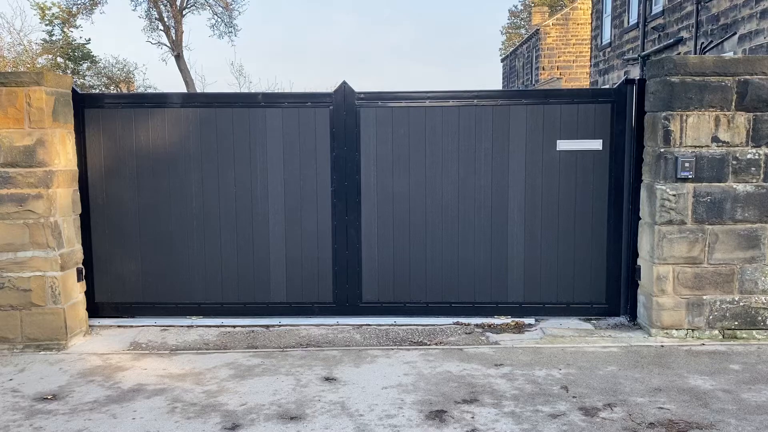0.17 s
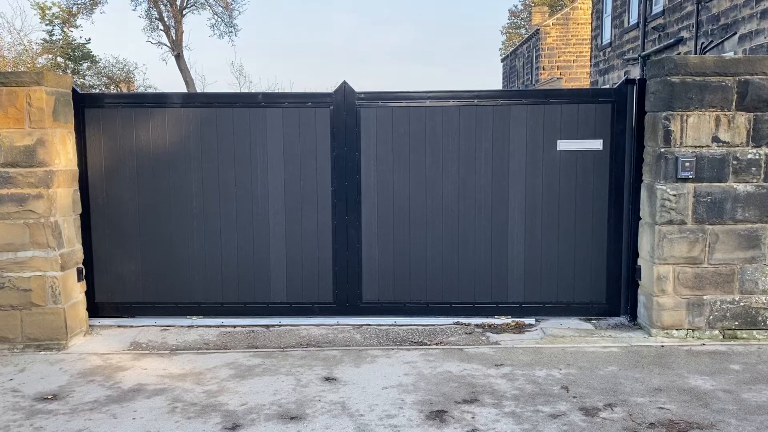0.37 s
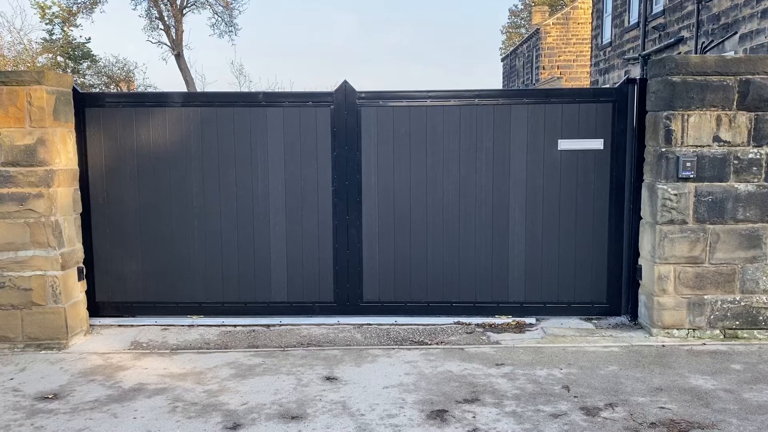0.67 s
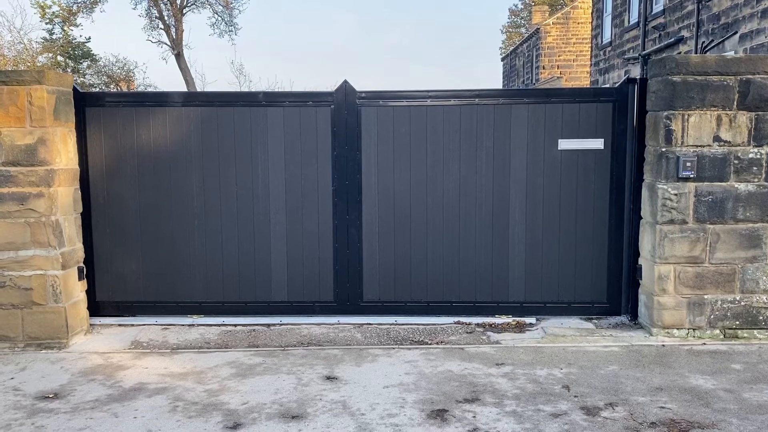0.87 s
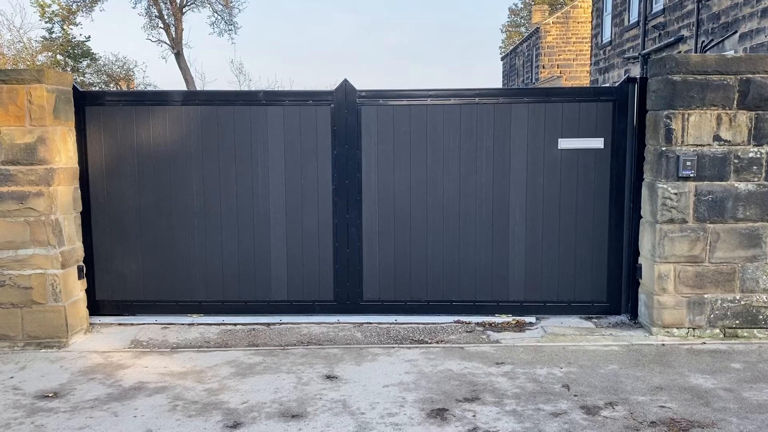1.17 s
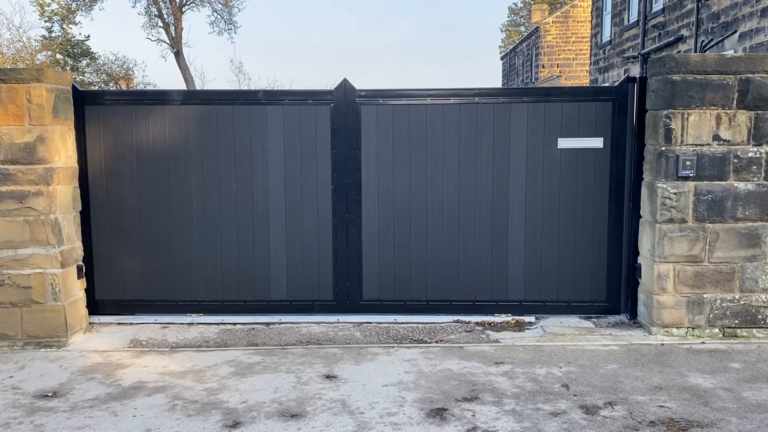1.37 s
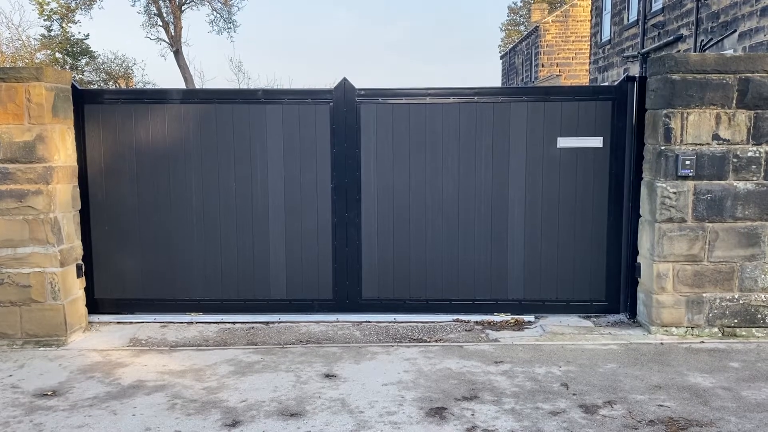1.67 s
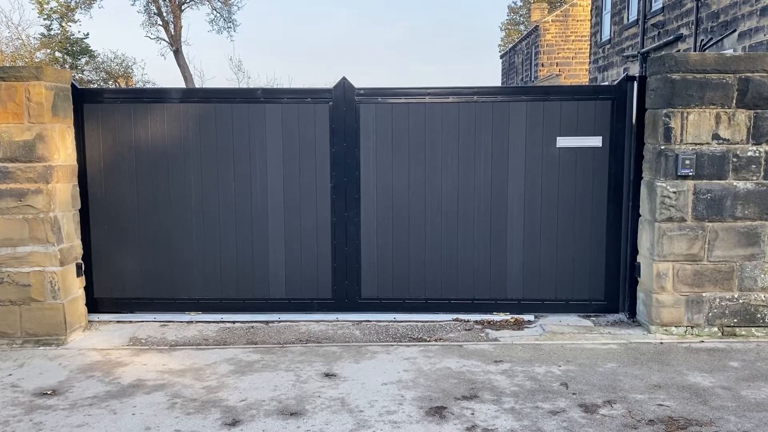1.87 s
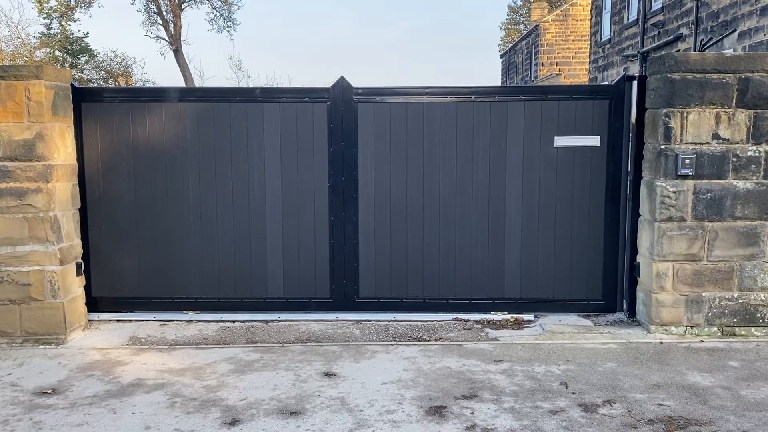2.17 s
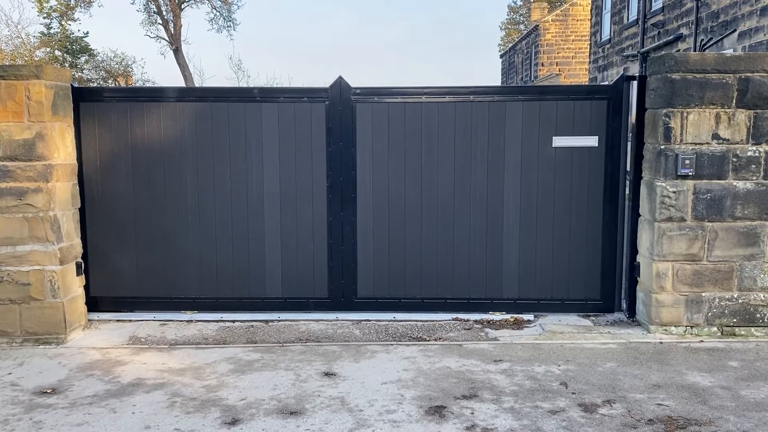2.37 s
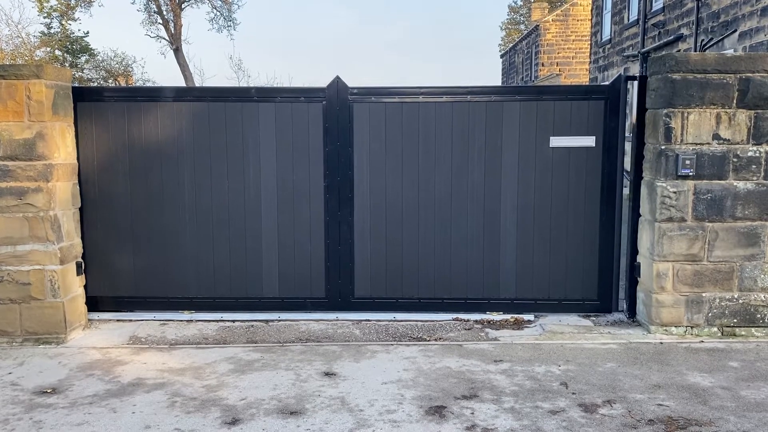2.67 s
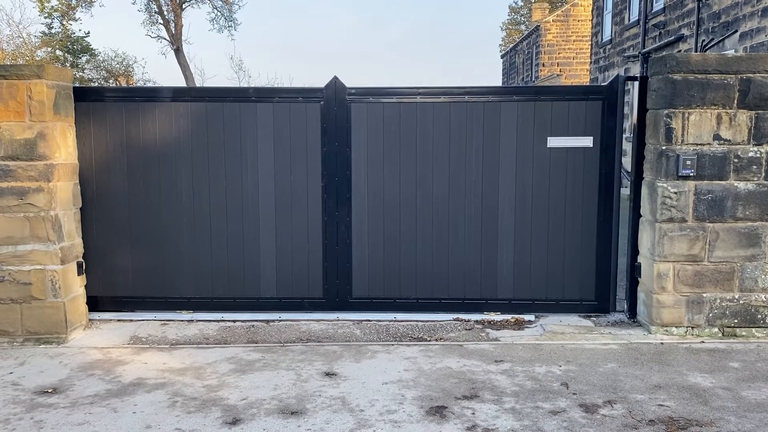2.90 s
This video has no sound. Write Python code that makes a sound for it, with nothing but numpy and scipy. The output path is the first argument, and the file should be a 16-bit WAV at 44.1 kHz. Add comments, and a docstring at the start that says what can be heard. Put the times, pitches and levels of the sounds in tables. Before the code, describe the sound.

Low outdoor traffic rumble and soft road hiss, a faint distant engine slowly climbing in pitch

```python
"""A quiet street outside a driveway gate, picked up by a phone with two microphone ports.
After a short silence, distant traffic rumbles and hisses: noise in bands that swell and flicker.
A lorry's drone dies away, a far engine climbs in pitch and a low hum sets in, all made of sines.
Small birds whistle, as gliding sines with an echo off the house walls. As the gate starts to slide,
its drive whines faintly, as tones and narrow noise, and its wheels hiss on the track, as shaped noise."""
import sys
import numpy as np
from scipy import signal
from scipy.fft import rfft, irfft
from scipy.io import wavfile
from scipy.ndimage import uniform_filter1d

SR = 44100
rng = np.random.default_rng(int(sys.argv[2]) if len(sys.argv) > 2 else 0)


def wrap_up_sound(samples):
    """Save the sound to the file named by the first command line argument, as 16-bit audio."""
    columns = np.atleast_2d(samples).T
    # keep every value between -1 and 1, then stretch to whole-number steps
    tamed = np.clip(columns, -1, 1)
    steps = np.round(tamed * 32767).astype(np.int16)
    wavfile.write(sys.argv[1], SR, steps)


def makeup_ratio(level_db):
    """Linear amplitude ratio for a level in decibels (20 dB per factor of ten)."""
    decades = np.asarray(level_db, float) / 20
    return 10 ** decades


N = 134064  # samples
T = np.arange(N) / SR  # time in seconds
F = np.maximum(np.fft.rfftfreq(N, 1 / SR), 1)  # frequency in Hz, kept above zero for the logarithms

# Spacing of the two microphone ports, heard as likeness, phase and balance:
# freq_hz, likeness (0-1), right_leads_rad, left_minus_right_db
PORT_RESPONSE = [(30, .995, .1, 0), (90, .97, .3, -.3), (260, .85, .55, -1.2), (430, .66, 1.2, -.3),
                 (780, .55, 2.8, -3.8), (1100, .63, 2.6, -2.9), (1700, .62, 2.4, -1.1),
                 (2000, .42, 1.6, -.6), (2200, .05, 0, 0), (2500, .4, -1.9, .2), (3100, .59, -1.6, -.6),
                 (4300, .43, -.5, 1.1), (6500, .27, .1, 1.5), (8000, .4, -2.6, .1), (9000, .6, -2.3, 0),
                 (10700, .88, 0, 0)]
# Spectrum shape of the distant traffic: freq_hz, relative_density_db (per Hz)
TRAFFIC_SPECTRUM = [(18, -43.5), (26, -25.5), (34, -21.5), (44, -2.5), (60, -0.5), (78, -6), (100, -9),
                    (128, -8.5), (160, -7.5), (209, -8.5), (245, -14.5), (310, -15.5), (400, -20.5),
                    (480, -21.5), (620, -24), (950, -21), (1300, -25), (1950, -30), (2500, -37.5),
                    (3200, -40), (4000, -47), (5000, -55.5), (6500, -64.5), (8500, -71), (10300, -73.5),
                    (11300, -75), (12200, -75)]
# Swells of the traffic, used relative to each column's mean: time_s, deep_bass_db, rumble_db, tyre_roar_db
TRAFFIC_SWELL = [(.1, -44.5, -48, -54.5), (.4, -49, -48, -55.5), (.9, -47, -50.5, -56),
                 (1.5, -48.5, -47.5, -57), (1.8, -50.5, -48.5, -56), (2.2, -48, -48.5, -56),
                 (2.6, -48, -49, -56), (3.0, -45.5, -47, -54.5)]
# Gain of the traffic's airy treble: time_s, gain_db
AIRY_TREBLE = [(.1, 3), (.6, -0.5), (1.0, -1), (1.5, -.5), (3.04, 3.5)]
# Far engine pulling away, before roughness: time_s, firing_hz, firing_level_db (rms), octave_level_db (rms)
ENGINE_RISE = [(.2, 100, -75, -76), (.6, 106.5, -56.5, -59), (1.1, 113.5, -60.5, -59),
               (1.6, 120, -60.5, -59), (2.0, 126.3, -61.5, -64), (2.25, 128.3, -56.5, -76.5),
               (2.7, 138.9, -55, -72), (3.04, 145.7, -51, -71)]
# Low hum, before its beating: time_s, level_db (rms)
HUM_LEVEL = [(.5, -54), (.85, -48.5), (1.04, -51), (1.15, -49), (1.48, -51), (1.75, -43.5), (2.3, -44),
             (2.66, -43.5), (3.03, -44)]
# Bird whistles: left_minus_right_db, then a list of time_s, pitch_hz, level_db (rms, before the warble)
BIRD_WHISTLES = [(-3, [(.35, 5480, -93), (.357, 5420, -83), (.369, 5270, -91), (.386, 5170, -80),
                 (.412, 5080, -78), (.43, 5030, -81), (.447, 4950, -75), (.46, 4840, -81),
                 (.472, 4720, -92)]), (-5, [(.404, 5720, -95), (.412, 5680, -87), (.422, 5650, -97),
                 (.436, 5650, -92), (.445, 5640, -98)]), (-2, [(.841, 5450, -90), (.845, 5480, -83),
                 (.851, 5560, -88), (.855, 5650, -94)]), (9, [(1.515, 5540, -91), (1.537, 5450, -86),
                 (1.547, 5420, -91), (1.572, 5310, -83), (1.586, 5240, -95), (1.595, 5270, -87),
                 (1.602, 5300, -93), (1.61, 5300, -82), (1.622, 5110, -88), (1.645, 5050, -95)])]
# Gate speeding up: time_s, wheels_gain_db, whine_gain_db
GATE_GAIN = [(1.6, -20, -11), (2.0, -17.5, -9), (2.45, -16.5, -7), (2.6, -15, -4), (2.8, -12, -7),
             (3.04, 1, 0)]
# Spectrum shape of the wheel hiss: freq_hz, relative_density_db (per Hz)
WHEEL_SPECTRUM = [(1500, -20.5), (2500, -10), (4000, 3.5), (6000, -6.5), (7800, -11.5), (9000, -24)]


def level(x, db):
    """Scale to an rms level in dB."""
    return x * makeup_ratio(db) / np.sqrt(np.mean(x ** 2))


def over_hz(table, col=1):
    """Read a table column along log frequency."""
    rows = np.array(table, float)
    return np.interp(np.log(F), np.log(rows[:, 0]), rows[:, col])


def over_t(table, col=1):
    """Read a table column along time."""
    rows = np.array(table, float)
    return np.interp(T, rows[:, 0], rows[:, col])


def walk(rate):
    """Random levels, rate of them per second, slewed smoothly by two averages; spread near 1."""
    hold = int(SR / rate)
    steps = np.repeat(rng.standard_normal(N // 200), hold)[:N]
    slewed = uniform_filter1d(uniform_filter1d(steps, hold), hold)
    return 1.185 * slewed  # makes up for the spread lost in averaging


def tone(hz):
    """Sine of rms 1 on a moving pitch, from a random phase."""
    cycles = np.cumsum(hz) / SR + rng.random()
    return np.sqrt(2) * np.sin(2 * np.pi * cycles)


def ports(one, other):
    """Left and right spectra: a shared part, turned in phase, and an unrelated part on the right."""
    likeness = np.clip(over_hz(PORT_RESPONSE, col=1), 0, 1)
    turn = np.exp(1j * over_hz(PORT_RESPONSE, col=2))
    tilt = makeup_ratio(over_hz(PORT_RESPONSE, col=3) / 2)
    right = likeness * one * turn + np.sqrt(1 - likeness ** 2) * other
    return np.array([one * tilt, right / tilt])


def diffuse(colour):
    """Coloured noise arriving from all around, as the spectra at the two ports."""
    shape = makeup_ratio(over_hz(colour)) * (F > colour[0][0])
    one, other = rfft(rng.standard_normal((2, N))) * shape
    return ports(one, other)


def placed(x):
    """One source through the phase and balance of the ports."""
    spectrum = rfft(x)
    return irfft(ports(spectrum, spectrum), N)


def traffic():
    """Distant traffic: diffuse noise in half-octave bands that swell together and flicker alone."""
    traffic_db = -43
    sub_edge_hz, rumble_edge_hz = 97, 250  # upper edges of the deep bass and the rumble
    flicker_db, bass_flicker_db = 1.71, -0.5  # the second is added in the bass
    treble_hz = 5000  # half of the treble gain applies here
    spectrum = diffuse(TRAFFIC_SPECTRUM)
    swells = [over_t(TRAFFIC_SWELL, col=k) for k in (1, 2, 3)]
    sub, rumble, roar = (swell - np.mean(swell) for swell in swells)
    out = 0
    for hz in 22 * 2 ** np.arange(0, 9.6, .5):
        band = np.cos(np.pi / 2 * np.clip(2 * np.log2(F / hz), -1, 1)) ** 2
        # how far the band belongs to the deep bass, and to all the bass
        deep = 1 / (1 + (hz / sub_edge_hz) ** 4)
        low = 1 / (1 + (hz / rumble_edge_hz) ** 4)
        swell_db = deep * sub + (low - deep) * rumble + (1 - low) * roar
        own_flicker_db = (low * bass_flicker_db + flicker_db) * walk(8.88)
        treble_db = over_t(AIRY_TREBLE) / (1 + (treble_hz / hz) ** 2)
        out = out + makeup_ratio(swell_db + own_flicker_db + treble_db) * irfft(spectrum * band, N)
    return level(out, traffic_db)


def engine():
    """Far engine's firing tone and octave rising together, and a lorry's lower drone dying away."""
    roughness_db = 1.5
    drone_hz, drone_start_db, drone_fade_db_per_s = 78, -42, 40
    firing_hz = over_t(ENGINE_RISE) * (1 + .006 * walk(8))
    out = 0
    for harmonic in (1, 2):
        db = over_t(ENGINE_RISE, col=harmonic + 1) + roughness_db * walk(9.2)
        out = out + makeup_ratio(db) * tone(harmonic * firing_hz)
    drone = tone(drone_hz * (1 + 0.0089 * walk(8.5)))
    return out + makeup_ratio(drone_start_db - drone_fade_db_per_s * T) * drone


def hum():
    """A low tone with a weak octave that fades in, throbs and wavers a little in pitch."""
    hum_hz, waver_hz = 46.5, .6
    beat_db, octave_db = 2.0, -19  # the octave is relative to the low tone
    fade_in = np.clip(T / HUM_LEVEL[0][0], 0, 1) ** 2
    hz = hum_hz + waver_hz * walk(3.7)
    throb = makeup_ratio(over_t(HUM_LEVEL) + beat_db * walk(10))
    return fade_in * throb * (tone(hz) + makeup_ratio(octave_db) * tone(2 * hz))


def birds():
    """Near-sine whistles that glide and warble in level, with one echo off the walls on each side."""
    edge_s, warble_db, warble_per_s = .003, 1.4, 140
    echo_s, echo_db = (.017, .023), -15  # house walls, left and right
    out = 0
    for pan_db, song in BIRD_WHISTLES:
        start_s, end_s = song[0][0], song[-1][0]
        envelope = np.clip(np.minimum(T - start_s, end_s - T) / edge_s, 0, 1)
        db = over_t(song, col=2) + warble_db * walk(warble_per_s)
        whistle = envelope * makeup_ratio(db) * tone(over_t(song))
        out = out + whistle * makeup_ratio(np.array([[pan_db], [-pan_db]]) / 2)
    echo = np.array([np.roll(side, int(delay_s * SR)) for side, delay_s in zip(out, echo_s)])
    return out + makeup_ratio(echo_db) * echo


def gate_whine():
    """Switching whine of the gate drive: a tone with shaft sidebands over narrow noise."""
    whine_hz, sideband_hz = 9997, 54
    line_db, noise_db = -110, -98.5  # before the gate's gain
    sideband_db = -1  # relative to the middle line
    lines = 0
    for k in (-1, 0, 1):
        db = sideband_db * abs(k) + 3.5 * walk(15)
        lines = lines + makeup_ratio(db) * tone(np.full(N, whine_hz + k * sideband_hz))
    narrow = np.exp(-((F - 10140) / 220) ** 4)  # centre and half-width in Hz
    fuzz = irfft(rfft(rng.standard_normal(N)) * narrow, N)
    whine = placed(makeup_ratio(line_db) * lines + level(fuzz, noise_db))
    return makeup_ratio(over_t(GATE_GAIN, col=2)) * whine


def gate_wheels():
    """Hiss of the gate's wheels on the track: flickering diffuse noise that follows the gate's gain."""
    wheels_db, flicker_db = -76.5, 6  # level before the flicker and the gate's gain
    spectrum = diffuse(WHEEL_SPECTRUM) * (F < WHEEL_SPECTRUM[-1][0])
    hiss = level(irfft(spectrum, N), wheels_db)
    return makeup_ratio(over_t(GATE_GAIN)) * hiss * makeup_ratio(flicker_db * walk(33.17))


def scene():
    """The whole street summed at the two microphone ports."""
    return traffic() + placed(engine() + hum()) + birds() + gate_whine() + gate_wheels()


def low_pass(x):
    """Removes everything above the highest recorded frequency."""
    return signal.sosfilt(signal.butter(12, 12200, fs=SR, output="sos"), x)


def record(dry):
    """Silence until the recorder starts, then a very short fade-in."""
    start_s, fade_s = .0722, .001
    mix = dry * np.clip((T - start_s) / fade_s, 0, 1)
    return low_pass(mix)


dry = scene()
out = record(dry)
wrap_up_sound(out)
```